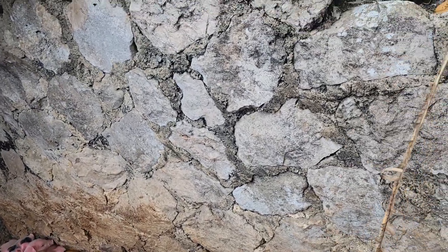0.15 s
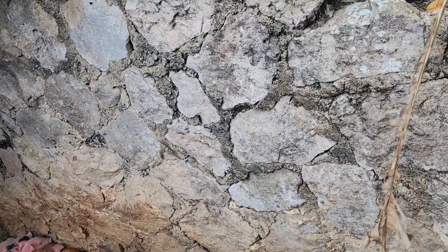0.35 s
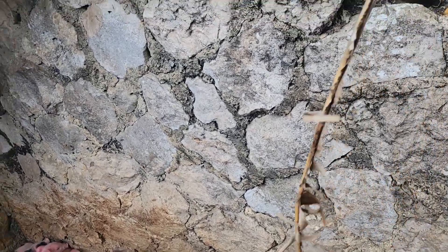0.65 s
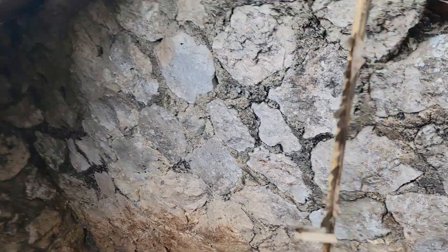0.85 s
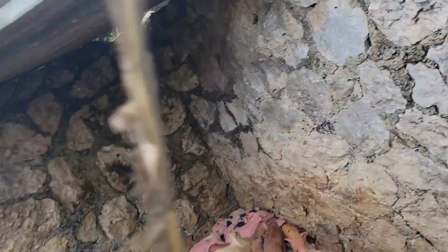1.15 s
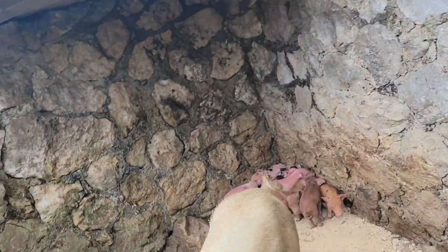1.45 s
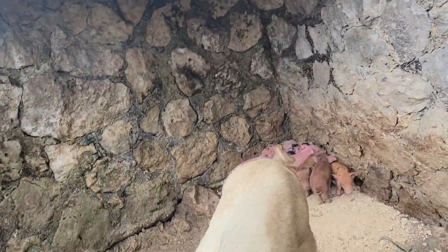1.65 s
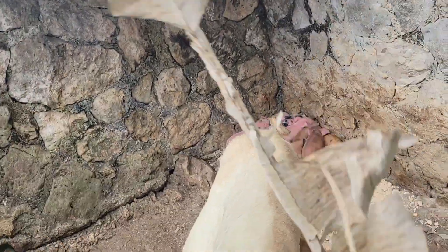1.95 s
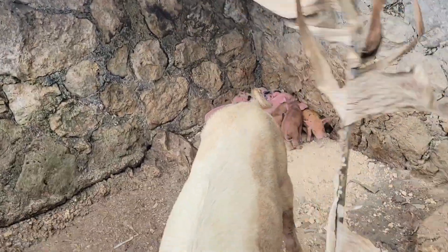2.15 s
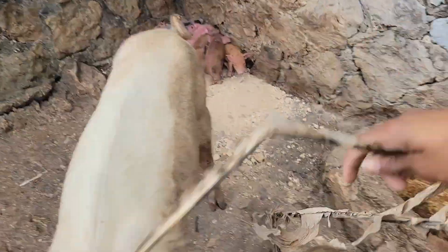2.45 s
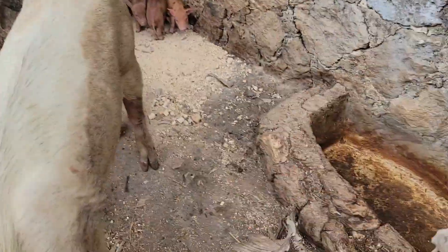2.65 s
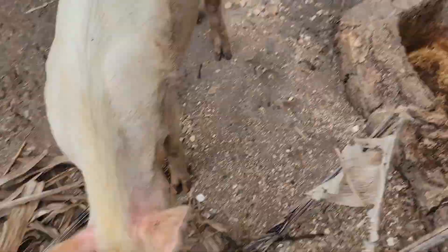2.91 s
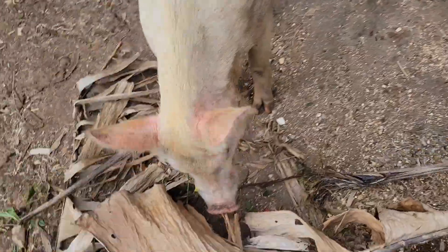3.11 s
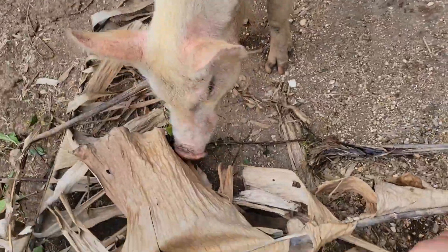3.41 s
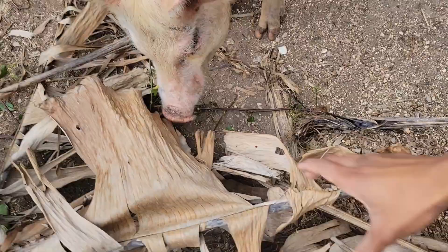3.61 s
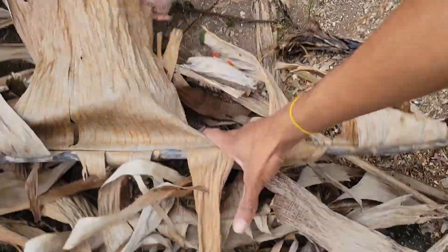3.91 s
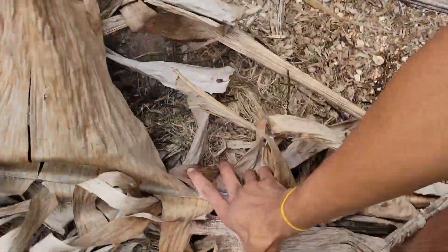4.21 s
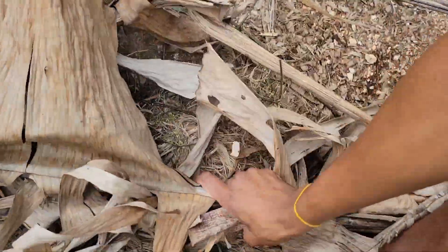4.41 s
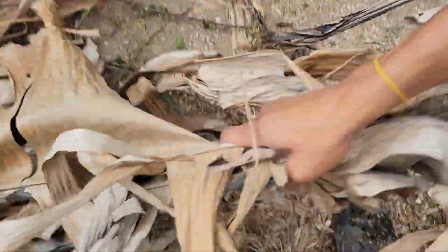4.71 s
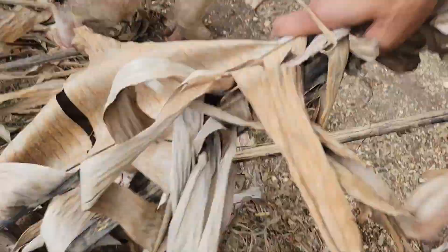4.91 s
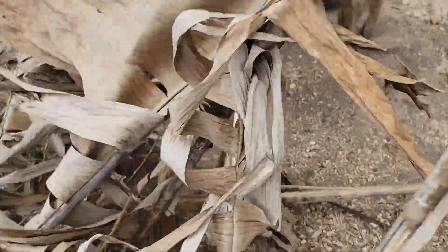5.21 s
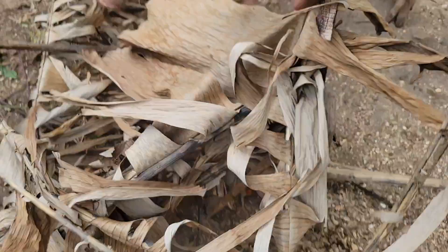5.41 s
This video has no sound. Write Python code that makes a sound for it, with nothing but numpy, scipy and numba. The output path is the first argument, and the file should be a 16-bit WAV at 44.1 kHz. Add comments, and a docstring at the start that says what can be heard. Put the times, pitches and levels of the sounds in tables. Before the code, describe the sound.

A sow gives short creaky grunts in a stone pen while dry leaves tick quietly, then crackle and snap loudly as a hand pushes them about.

```python
"""A sow gives short creaky grunts in a stone pen: bursts of voice ring her snout, mouth and chest.
A hand drops and pushes dry leaves about: dense grains crackle over a papery body, and ribs snap.
Soil scuffles under low hums and thuds; the walls scatter a short tail of grunts and snaps.
A phone with two spaced ports hears the sounds with differing lags."""
import sys
import numpy as np
from scipy import signal
from scipy.io import wavfile
from scipy.ndimage import uniform_filter1d
from numba import njit

SR = 44100
rng = np.random.default_rng(int(sys.argv[2]) if len(sys.argv) > 2 else 0)


def wav_out(sig):
    """Save sig, one row per channel (or a flat mono array), as 16-bit PCM at SR to the path in sys.argv[1]."""
    wavfile.write(sys.argv[1], SR, np.round(np.clip(np.atleast_2d(sig).T, -1, 1) * 32767).astype(np.int16))


N = 245195
T = np.arange(N) / SR
PORT_LAG_S = .0007  # longest path difference between the two ports
NEAR_LAG_S = .0003  # lag of snaps, hums and thuds at the right port

# dry leaves stirring all the while: start_s, crackle_db
STIR = [(0.0, -53), (0.24, -44.5), (0.36, -46.5), (0.51, -37), (0.71, -48.5), (0.83, -39), (0.96, -42),
        (1.1, -42), (1.3, -53.5), (1.63, -39.5), (1.72, -49), (2.0, -49), (2.2, -43.5), (2.55, -50.5),
        (2.68, -35), (2.82, -39.5), (2.87, -56), (2.905, -42.5), (3.2, -39), (3.45, -47.5), (3.86, -48),
        (3.884, -30.5), (4.01, -23), (4.1, -26.5), (4.45, -28.5), (4.78, -29), (4.835, -32), (4.95, -31),
        (5.1, -29), (5.28, -25), (5.4, -27), (5.56, -24.5)]
# low hums from the sow's body, thuds and bumps: peak_s, low_db, scrape_db, tone_hz
LOW_HUMS_AND_THUDS = [(0.0, -51, -55, 79), (0.119, -42.5, -54, 87), (0.281, -34.5, -41, 57),
                      (0.599, -44.5, -52, 102.5), (0.783, -44, -47.5, 100), (0.853, -37.5, -40, 51),
                      (1.318, -40, -51.5, 93), (1.53, -44, -52, 107), (1.621, -41.5, -40.5, 104),
                      (1.989, -52, -61, 195), (2.198, -41, -35, 216), (2.219, -35.5, -52, 109),
                      (2.259, -42, -70, 52), (2.577, -43, -36.5, 104), (2.599, -33, -55, 225),
                      (2.63, -31, -52, 43.5), (2.698, -39.5, -36, 156), (2.928, -44.5, -46, 209),
                      (3.098, -37, -52, 60.6), (3.129, -42, -49, 179), (3.221, -47, -41.5, 60),
                      (3.334, -31, -40.5, 99), (3.598, -47.5, -45.5, 96.5), (3.808, -51, -48.5, 88),
                      (3.89, -42, -34, 80), (4.03, -44, -31.5, 150), (4.597, -34.5, -33, 102),
                      (4.801, -43, -55, 73), (5.235, -31, -49, 191), (5.269, -29, -25, 45.6),
                      (5.481, -35.5, -28.5, 57), (5.55, -38, -34, 55)]


def undb(db):
    """Decibels to gain."""
    return 10 ** (np.asarray(db) / 20)


def unit(x):
    """Scale to rms 1."""
    return x / np.sqrt(np.mean(x ** 2))


@njit
def svf(x, hz, width_hz):
    """State-variable band-pass, gain 1 at the centre."""
    y, band, low = np.empty(len(x)), 0., 0.
    g, k = np.tan(np.pi * hz / SR), width_hz / hz
    for i in range(len(x)):
        v = (band + g * (x[i] + 1e-18 - low)) / (1 + g * (g + k))
        band, low, y[i] = 2 * v - band, low + 2 * g * v, k * v
    return y


def walk(rate_hz):
    """Random levels held 1 / rate_hz s and slewed; spread near 0.5."""
    k = int(SR / rate_hz)
    held = np.repeat(rng.standard_normal(N // k + 1), k)
    return 0.61 * uniform_filter1d(held, k)[:N]


def ports(x, lag_s, pan_db):
    """Left and right port: the right hears it lag_s later; pan_db is left minus right."""
    i = np.arange(len(x))
    late = np.interp(i - lag_s * SR, i, x)
    return np.array([x * undb(pan_db / 2), late * undb(-pan_db / 2)])


def colour(spectrum, hz):
    """Level of a half-octave band of a spectrum given in dB per Hz."""
    f_hz, density_db = np.transpose(spectrum)
    return np.interp(np.log(hz), np.log(f_hz), density_db) + 10 * np.log10(hz)


def swells(start_s, peak_db, rise_db_s, fall_db_s, under_db):
    """Level of events that rise to a peak and fall away, added in power to what lies under them."""
    late_s = T - np.array(start_s)[:, None]
    slope_db_s = np.where(late_s < 0, -rise_db_s, fall_db_s)
    each_db = np.array(peak_db)[:, None] - slope_db_s * late_s
    return 10 * np.log10(undb(2 * under_db) + undb(2 * each_db).sum(axis=0))


def grains(hz, rate_hz, spread_db, aside, share=0.67):
    """One band of tiny clicks, each from its own direction; aside 1 = all from the ends of the phone."""
    when, size, angle, sign = rng.random((int(rate_hz * N / SR), 4)).T
    size = undb(-spread_db * np.log(size + 0.0037)) * np.where(sign < .5, -1, 1)
    angle = 2 * angle - 1
    lag = np.sign(angle) * (aside + (1 - aside) * abs(angle)) * PORT_LAG_S * SR / 2
    trains = []
    for side in (-1, 1):
        place = np.clip(when * N + side * lag, 0, N - 1).astype(int)
        trains.append(np.bincount(place, size, N))
    width_hz = hz * share
    return unit(np.array([svf(svf(x, hz, width_hz), hz, width_hz) for x in trains]))


def ring(x, modes):
    """Resonances of alternating sign, each applied twice so that the valleys stay dark."""
    out = 0
    for k, (hz, width_hz, db) in enumerate(modes):
        once = svf(x, 1. * hz, 1. * width_hz)
        out = out + (-1) ** k * undb(db) * svf(once, 1. * hz, 1. * width_hz)
    return unit(out)


def sow():
    """The voice catches in short bursts: a few fold pulses each, dying away, roughened by breath."""
    # start_s, swell_s, hold_s, release_db_s, effort_db, then as the grunt starts: mouth_db, chest_db,
    # resonance_rise_per_s, burst_s, pitch_hz, bursts_hz, roughness (0-1), snout_hz
    grunts = [(0.225, 0.0096, 0.016, 708, -20.5, -33, -7, 4.1, 0.016, 118, 30, .12, 740),
              (0.253, 0.0035, 0.0074, 351, -17, 5, -22, 1.27, 0.026, 150, 28, .12, 700),
              (0.269, 0.0063, 0.017, 602, -38, -7, 15, 0.4, 0.0085, 150, 24, .1, 680),
              (0.83, 0.0035, 0.004, 506, -17, -3.5, -12, 0.19, 0.0073, 156, 55, .08, 780),
              (1.5, 0.021, 0.029, 600, -41, -3, 5, 1.49, 0.0083, 118.6, 38, 0.4, 770),
              (2.186, 0.00022, 0.019, 398, -29.5, -6, -2.5, 0.44, 0.0037, 150, 51, .15, 540),
              (2.203, 0.00094, 0.0022, 748, -17.5, -11, -3.5, 0.15, 0.011, 152, 105, .15, 600),
              (2.237, 0, 0.019, 528, -24.5, -10.5, -8, 3.9, 0.0073, 149, 56, .15, 560),
              (2.558, 0.027, 0.044, 594, -33.5, -1.5, 0, 0.64, 0.0062, 146, 42, .3, 520),
              (2.632, 0.007, 0.002, 415, -22, -10.5, -6.5, 0.41, 0.0023, 140, 37, .2, 600),
              (2.682, 0.0043, 0.002, 692, -31, -26, -2.5, 0.16, 0.0023, 120, 37, .15, 420),
              (3.049, 0.0019, 0.095, 406, -56, 6, 9, 0.27, 0.0046, 118, 27, 0.56, 524),
              (3.299, 0.03, 0.0083, 355, -43.5, 3.5, 8, 0.35, 0.07, 105, 9, .12, 780),
              (3.591, 0.038, 0.0094, 628, -42.5, 4.5, -2.5, 0.36, .007, 120, 43, 0.9, 835),
              (4.565, 0.0052, 0.047, 303, -43, 12.5, 4.5, 0.52, 0.0096, 149, 25, 0.21, 576),
              (5.193, 0.039, 0.003, 400, -19, -8, -17.5, 0.43, 0.0025, 160, 42.5, .08, 680),
              (5.507, 0, 0.01, 354, -29, 2, 0, 0.37, 0.0046, 156.3, 52, 0.43, 585)]
    # mouth resonances as the grunt starts: centre_hz, width_hz, level_db
    mouth_modes = [(1098, 88, 7), (1270, 330, -10.5), (1564, 120, -13), (2060, 180, -31), (3500, 230, -8.5)]
    swell_db, release_span_db, lag_s = 8, 28.5, .00046
    snout_width_hz, chest_width_hz = 170, 120
    mouth_loss_db_s, chest_gain_db_s = 81, 66  # mouth closes, chest takes over; ahead of the speed-up
    chest_carry = .35  # share of the voice that keeps the chest humming between bursts
    fold_filter = signal.butter(4, 2080, fs=SR)  # the folds close softly
    out = np.zeros((2, N))
    for (s, swell_s, hold_s, release_db_s, effort_db, mouth_db, chest_db, rise_per_s, burst_s,
         pitch_hz, bursts_hz, rough, snout_hz) in grunts:
        a = int(s * SR)
        rough, swell_s, hold_s = np.clip(rough, 0, 1), max(swell_s, 0), max(hold_s, 0)
        t = T[a:int((s + swell_s + hold_s + release_span_db / release_db_s) * SR)] - s

        gaps_s = (1 + 0.091 * rough * rng.standard_normal(20)) / bursts_hz
        starts_s = np.cumsum(np.r_[0, gaps_s])
        latest = np.clip(np.searchsorted(starts_s, t, "right") - 1, 0, None)
        since_s = abs(t - starts_s[latest])

        breath = rng.standard_normal(14000)[:len(t)]
        waver = unit(svf(breath, 60., 48.))
        cycle = (since_s * pitch_hz + 0.15 * rough * waver) % 1
        folds = np.diff(np.exp(-cycle / 0.19), prepend=0)
        voice = signal.lfilter(*fold_filter, unit(folds) + 1.6 * rough * breath)
        burst = np.exp(-(since_s / burst_s) ** 2) + .2 * rough
        air = voice * burst

        snout = ring(air, [(snout_hz, snout_width_hz, 0)])
        mouth = undb(mouth_db - mouth_loss_db_s * t) * ring(air, mouth_modes)
        # the chest rings at twice the pitch
        chest = ring(air + chest_carry * voice, [(2 * pitch_hz, chest_width_hz, 0)])
        chest = chest * undb(chest_db + chest_gain_db_s * t)

        # the throat tightens: the sound runs ever faster, so pitch and resonances climb
        fast_s = t + rise_per_s * t ** 2 / 2
        head = np.interp(fast_s, t, snout + mouth, right=0)
        chest = np.interp(fast_s, t, chest, right=0)

        level_db = effort_db - swell_db * np.clip(1 - t / (swell_s + 1 / SR), 0, 1)
        level_db = level_db - release_db_s * np.clip(t - swell_s - hold_s, 0, None)
        heard = ports(head, lag_s, -6.5) + ports(chest, lag_s, -8.5)
        out[:, a:a + len(t)] += undb(level_db) * heard
    return out


def ticks(rate_hz, db):
    """Lone crumbs of leaf cracking: broad noise bursts a few milliseconds long."""
    when, size = rng.random((int(rate_hz * N / SR), 2)).T
    train = np.bincount((when * N).astype(int), size ** 2, N)
    shape = signal.lfilter([1], [1, -np.exp(-1 / (0.003 * SR))], train)
    both = [svf(shape * rng.standard_normal(N), 2400., 6900.) for _ in range(2)]
    return undb(db) * unit(np.array(both))


def leaves():
    """Crackle on top, a papery body below; all bands bristle together and flicker alone."""
    # leaf spectrum: centre_hz, density_db (per Hz)
    leaf_spectrum = [(650, -30), (1100, 2), (1730, -14.5), (2580, -3), (4740, -11), (11100, -14.5),
                     (14700, -15), (15500, -18)]
    # handfuls crushed at once: peak_s, peak_db, paper_db (papery body minus crackle)
    crunches = [(0.067, -63.5, 16.5), (1.005, -23, -2.5), (1.134, -37, -7), (1.16, -36, -2.5),
                (1.222, -47, 9), (1.451, -48, -23), (1.812, -53, -12), (2.02, -41, -20), (2.567, -31.5, -3),
                (3.128, -41.5, 14), (3.644, -40.5, -4.5), (4.0, -27, -4), (4.07, -24, -9),
                (4.166, -35, 12.5), (4.53, -31, 2), (4.876, -33.5, 8), (4.971, -22, -5), (5.2, -43, 1),
                (5.299, -12, -8), (5.348, -12, -26), (5.47, -20.5, -14)]
    # stiff folds of leaf that pop: centre_hz, level_db
    creases = [(750, 4.5), (1100, 1), (1280, -1.5), (2100, -2.5), (2700, -1), (4000, -8.5)]
    rise_db_s, fall_db_s = 1500, 503
    # papery body against the crackle at quiet_db; it gains as the rustle grows
    body_db, body_per_db, quiet_db = -9.5, 0.2765, -50
    crease_rate_hz, crease_db = 45, -4.5  # pops in each fold; level against the papery body

    start_s, peak_db, paper_db = np.transpose(crunches)
    stir_db = np.interp(T, *np.transpose(STIR))
    crackle_db = swells(start_s, peak_db, rise_db_s, fall_db_s, stir_db)
    stir_body_db = stir_db + body_db + body_per_db * (stir_db - quiet_db)
    body_level_db = swells(start_s, peak_db + paper_db, rise_db_s, fall_db_s, stir_body_db)
    excess_db = body_level_db - crackle_db

    rustle, side_db = 0, walk(6.)
    bristle_db = 3.3 * walk(25.007) + 1.02 * walk(77)
    for hz in 1190 * 2 ** np.arange(0, 4.1, .5):
        papery = np.clip(np.log2(5000 / hz), 0, 1)
        band_db = colour(leaf_spectrum, hz) + papery * excess_db + bristle_db + 4.4 * walk(12)
        # the hand shades the left port, except in the top treble
        pan_db = side_db - 4.6 * np.clip(np.log2(9000 / hz), 0, 1)
        both_db = band_db + np.array([pan_db, -pan_db]) / 2
        rustle = rustle + undb(both_db) * grains(min(hz, 15000.), 2.5 * hz, spread_db=0., aside=.3)

    pops = 0
    for hz, pop_db in creases:
        fold = grains(1. * hz, crease_rate_hz, spread_db=2., aside=0.52, share=0.12)
        pops = pops + undb(pop_db) * fold
    mix = unit(rustle) + ticks(120, db=-9) + unit(pops) * undb(crease_db + excess_db)
    return mix * undb(crackle_db)


def snaps():
    """A rib breaks: a short ring, an undertone if it is high, and splinters flying all round."""
    # leaf ribs snapping: start_s, peak_db, ring_hz, splinter_db (against the ring)
    ribs = [(0.117, -27.5, 3040, 0), (0.415, -25, 786, -0.5), (0.553, -24, 2560, -18),
            (0.6, -23.5, 2300, -2.5), (0.999, -26, 3180, -20), (1.003, -14, 3300, -17),
            (1.127, -27, 9800, -14), (1.156, -30, 4300, 0), (1.158, -24.5, 850, -31),
            (1.81, -16.5, 3070, -1), (1.876, -30, 4140, -37), (1.893, -31, 3700, 0), (1.937, -33, 2090, 3),
            (1.953, -29.5, 3170, 7), (2.14, -26.5, 1230, 0), (2.563, -25, 1140, -16),
            (3.114, -17.5, 920, -22), (3.118, -20.5, 308, -18), (3.629, -22, 980, -21),
            (3.81, -24.5, 845, -30), (3.858, -18, 1180, -15), (3.978, -9, 2570, -15),
            (3.991, -6.5, 2400, -15), (4.062, -16, 1060, 14), (4.085, -15.5, 1030, -6),
            (4.153, -9.5, 2270, -13), (4.171, -11, 2450, -7), (4.516, -9.5, 1300, -2.5),
            (4.855, -17, 1410, 5), (4.872, -18, 885, 7), (4.967, -9.5, 2810, 1), (5.203, -9, 1240, 7),
            (5.267, -5, 1360, -17), (5.296, -5, 1160, -6), (5.3, -8, 690, 0), (5.344, -6, 3000, 8),
            (5.455, -7, 2970, 21), (5.544, -5.5, 1300, 1)]
    rise_s, t60_s, width_hz = .000963, .038, 100
    undertone_from_hz = 1450  # only thin, high ribs have an undertone
    out, t = np.zeros((2, N + 6000)), T[:6000]
    fade = (1 - np.exp(-t / rise_s)) ** 2 * undb(-60 * t / t60_s)
    for s, peak_db, hz, splinter_db in ribs:
        burst = rng.standard_normal((3, len(t))) * fade
        burst[0, int(rise_s * SR)] += 30  # the break itself
        tone = svf(burst[0], 1. * hz, width_hz + hz / 60)
        if hz > undertone_from_hz:
            tone = tone + svf(burst[0], hz / 2, 1. * width_hz)
        splinters = np.array([svf(x, 4900., 24000.) for x in burst[1:]])
        snap = ports(unit(tone), NEAR_LAG_S, -6.5) + undb(splinter_db) * unit(splinters)
        a = int(s * SR)
        out[:, a:a + len(t)] += snap * undb(peak_db) / abs(snap).max()
    return out[:, :N]


def scuffle():
    """Broad, dull noise in the bass under the hums and thuds, scraping lumps of soil and stalk above."""
    # soil spectrum: centre_hz, density_db (per Hz)
    soil_spectrum = [(15, -51), (25, -7), (95, -2.5), (253, -7.5), (296, -4.5), (770, -5.5), (885, 6),
                     (1150, -18), (1600, -28), (2080, -35), (3520, -120)]
    rise_db_s, low_fall_db_s, scrape_fall_db_s = 351, 241, 94
    rumble_db, broad_db = -63, -5  # bass between events; broad part against low_db
    stalks_db = -10  # stalks dragged with the leaves, against their crackle
    peak_s, low_db, scrape_db, _ = np.transpose(LOW_HUMS_AND_THUDS)
    low_db = swells(peak_s, low_db + broad_db, rise_db_s, low_fall_db_s, rumble_db)
    drag_db = np.interp(T, *np.transpose(STIR)) + stalks_db
    scrape_db = swells(peak_s, scrape_db, rise_db_s, scrape_fall_db_s, drag_db)
    low, scrape, lumps_db = 0, 0, 1.8 * walk(8.6)
    for hz in 31 * 2 ** np.arange(0, 5.6, .5):
        share = np.clip(np.log2(hz / 110), 0, 1)
        band_db = colour(soil_spectrum, hz) + lumps_db + 1.35 * walk(7.1)
        band = undb(band_db) * grains(hz, 400 + 3. * hz, spread_db=3.5, aside=0.15)
        low = low + (1 - share) * band
        scrape = scrape + share * band
    mix = unit(low) * undb(low_db) + unit(scrape) * undb(scrape_db)
    return mix * undb(np.array([[-1.7], [1.7]]))


def hums_and_thuds():
    """Low hums and thuds, each swelling and fading at its own wavering pitch."""
    rise_db_s, fall_db_s, waver_width_hz = 333, 297, 16
    lead = 8000  # samples on each side of the peak
    out, t = np.zeros(N + 2 * lead), T[:2 * lead] - T[lead]
    slope_db_s = np.where(t < 0, -rise_db_s, fall_db_s)
    for s, low_db, _, hz in LOW_HUMS_AND_THUDS:
        waver = unit(svf(rng.standard_normal(len(t)), 1. * hz, 1. * waver_width_hz))
        tone = np.sin(2 * np.pi * (hz * t + rng.random())) + 0.69 * waver
        a = int(s * SR)
        out[a:a + len(t)] += tone * undb(low_db - slope_db_s * t)
    return ports(out[lead:lead + N], NEAR_LAG_S, -3.2)


def walls(near):
    """Rough stone scatters a short, dull tail: convolution with decaying low-passed noise."""
    t60_s, level_db, top_hz = .11, -21, 2600
    t = T[:8000]
    tail = rng.standard_normal((2, len(t))) * undb(-60 * t / t60_s) * (t > .005)
    tail = signal.lfilter(*signal.butter(1, top_hz, fs=SR), tail)
    tail = tail / np.sqrt(np.sum(tail ** 2) / 2)
    return undb(level_db) * signal.fftconvolve(near, tail, axes=1)[:, :N]


def scene():
    """Sow and snaps ring in the pen; rustle, scuffle, hums and thuds are added without the walls."""
    near = sow() + snaps()
    return near + walls(near) + leaves() + scuffle() + hums_and_thuds()


def record(dry):
    """The phone rounds the loudest peaks, drops the deepest bass and cuts the top."""
    bass_cut = signal.butter(2, 32, "high", fs=SR, output="sos")
    top_cut = signal.ellip(12, .2, 85, 15600, fs=SR, output="sos")
    return signal.sosfilt(top_cut, signal.sosfilt(bass_cut, np.tanh(dry)))


dry = scene()
out = record(dry)
wav_out(out)
```